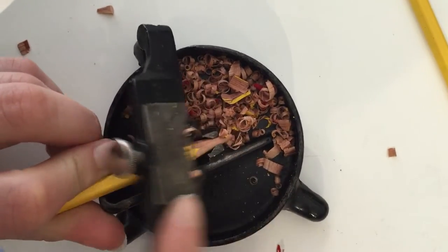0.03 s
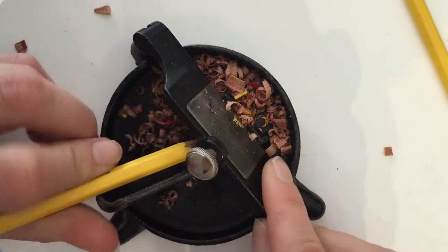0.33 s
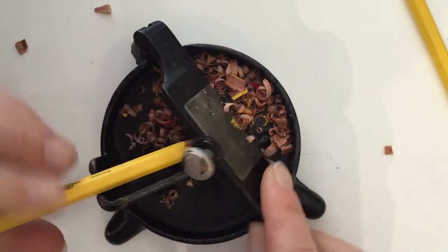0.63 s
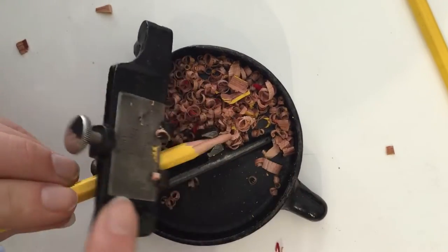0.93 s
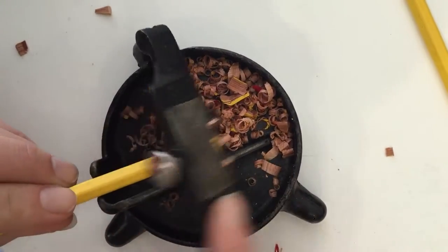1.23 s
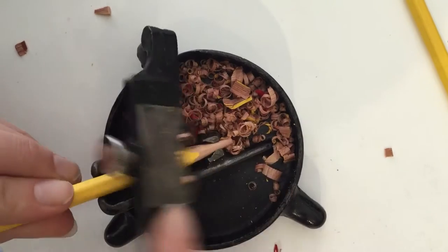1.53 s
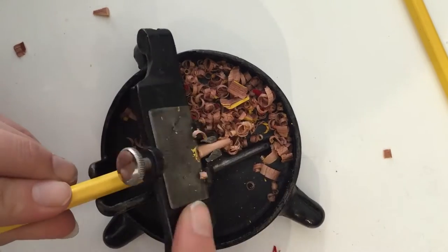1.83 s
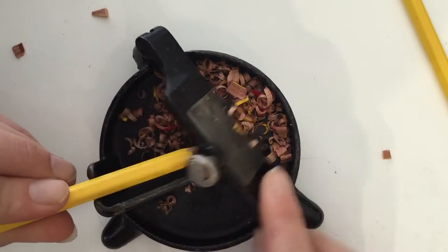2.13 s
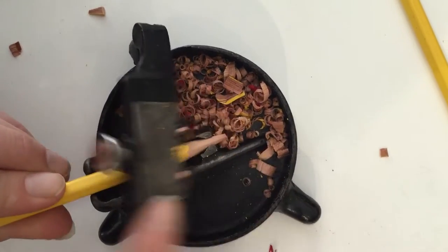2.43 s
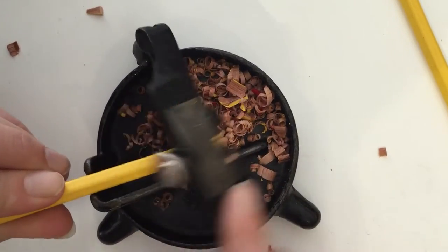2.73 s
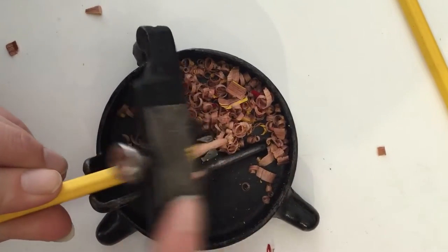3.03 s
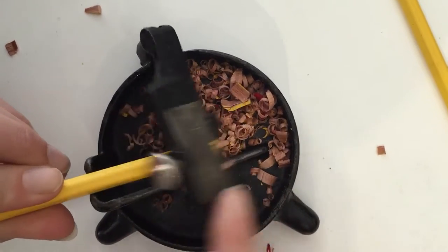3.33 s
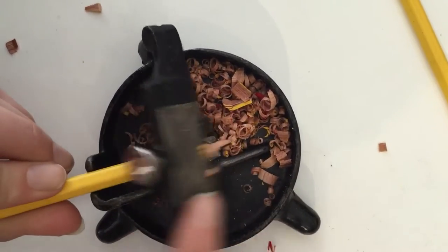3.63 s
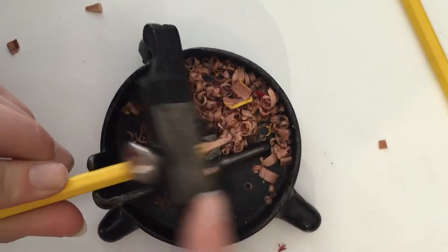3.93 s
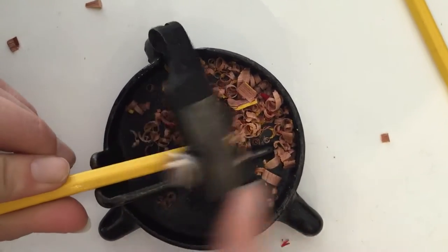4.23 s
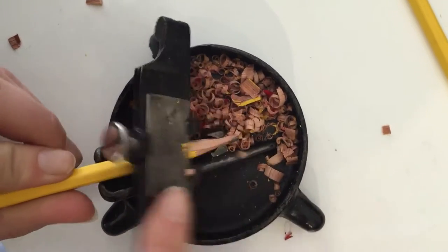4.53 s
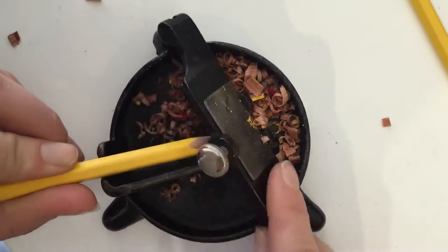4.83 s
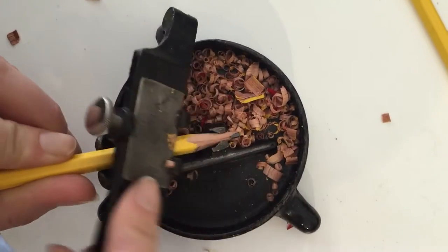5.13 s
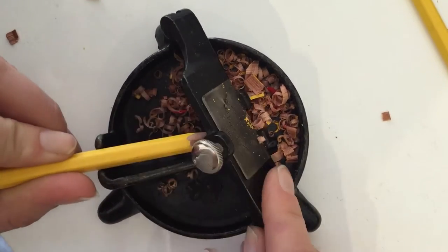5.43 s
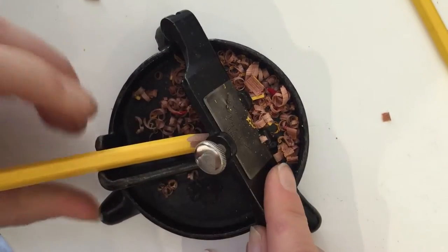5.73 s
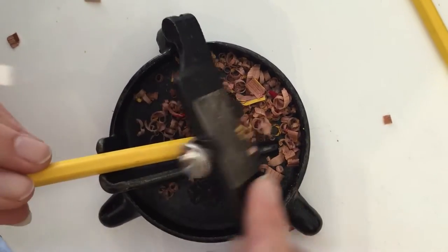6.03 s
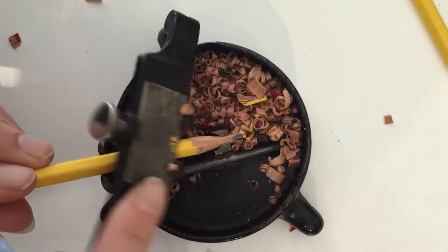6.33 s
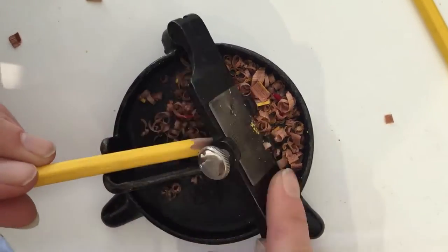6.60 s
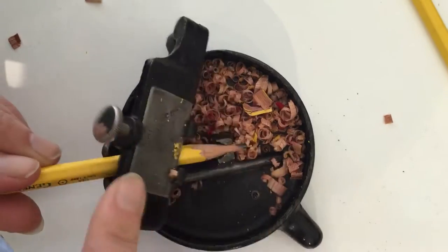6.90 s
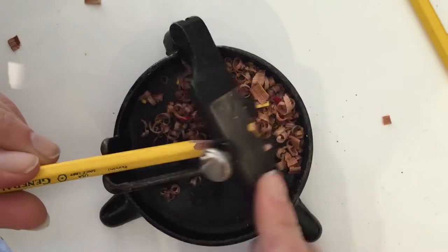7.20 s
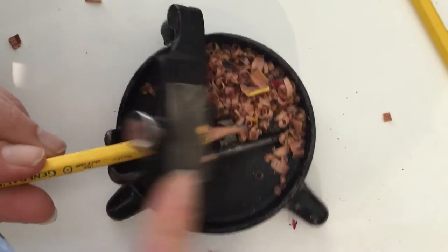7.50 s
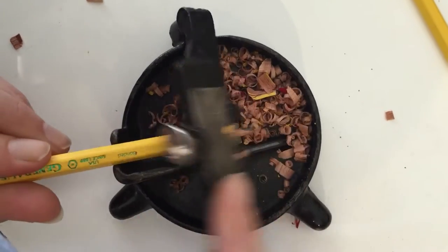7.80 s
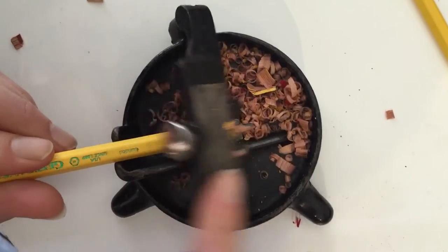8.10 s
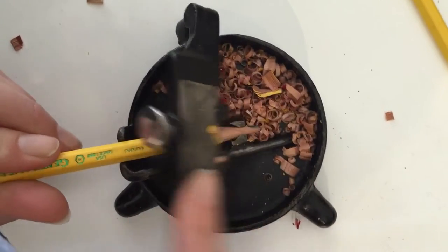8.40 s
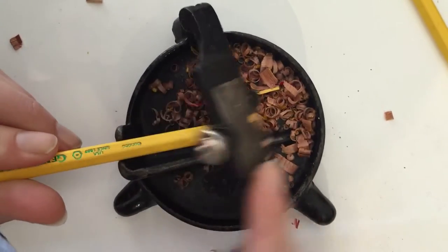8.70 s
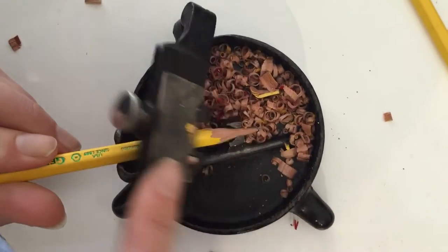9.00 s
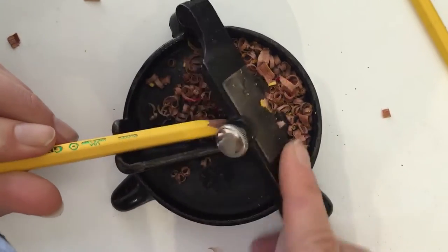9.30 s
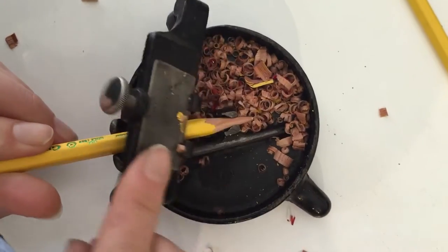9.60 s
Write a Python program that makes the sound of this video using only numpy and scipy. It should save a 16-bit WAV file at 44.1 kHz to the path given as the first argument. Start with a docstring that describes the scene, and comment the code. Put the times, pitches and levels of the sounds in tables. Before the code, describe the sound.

Close, raspy strokes of a blade shaving pencil wood, about two a second, alternate with clicks and knocks in a faintly humming room.

```python
"""At a table in a small, faintly humming room, a finger swings a hinged blade to and fro to sharpen a pencil.
Each cut tears wood fibres, whose fractures hiss and drive the resonances of the blade and of the
plastic tray beneath it. On the way back the blade only brushes the wood. The hollow arm clicks
and knocks at its turns, shavings drop, and the walls add a short reverberation."""
import sys
import numpy as np
from scipy import signal
from scipy.fft import rfft, irfft, next_fast_len
from scipy.io import wavfile
from scipy.ndimage import uniform_filter1d, map_coordinates

SR = 44100
rng = np.random.default_rng(int(sys.argv[2]) if len(sys.argv) > 2 else 0)


def log_audio(samples):
    """Write samples as a 16-bit WAV file to the path given in sys.argv[1]."""
    # one column per channel
    frames = np.atleast_2d(samples).T
    # limit to full scale, then quantise
    limited = np.clip(frames, -1, 1)
    pcm = np.round(limited * 32767).astype(np.int16)
    wavfile.write(sys.argv[1], SR, pcm)


N = 429975

# Cutting strokes. Each row: start and end in seconds, then force, mid-stroke hiss and hiss rise in dB.
CUT_STROKES = [(0.143, .32, -43.5, -51, -1), (1.227, 1.379, -41.5, -48, 6), (1.862, 1.88, -43, -51, 2),
               (1.935, 2.029, -37.5, -45.5, 12), (2.524, 2.648, -37.5, -44.5, 6),
               (3.086, 3.196, -40, -45, 4), (3.639, 3.779, -38, -41.5, 10), (4.2, 4.336, -40.5, -44, 17),
               (4.739, 4.878, -41.5, -45.5, 10), (5.35, 5.472, -38, -42.5, 1),
               (6.465, 6.611, -41, -42, 18.5), (7.051, 7.171, -38, -40.5, 16),
               (7.574, 7.679, -44.5, -40, 21), (8.134, 8.245, -42.5, -44.5, 11.5),
               (8.678, 8.798, -42.5, -46, 0), (9.235, 9.334, -45, -43.5, 2)]
# Return strokes. Each row: start and end in seconds, force in dB.
RETURN_STROKES = [(0.797, 1.035, -69.5), (1.514, 1.652, -63), (1.78, 1.848, -64.5), (2.078, 2.15, -67),
                  (2.261, 2.422, -61.5), (2.803, 2.921, -57), (3.376, 3.527, -59.5), (3.945, 4.075, -60),
                  (4.513, 4.611, -55), (5.023, 5.185, -60), (6.129, 6.27, -60), (6.788, 6.893, -53),
                  (7.31, 7.454, -55), (7.837, 7.959, -57.5), (8.395, 8.508, -57), (8.96, 9.08, -59),
                  (9.51, 9.63, -58.5)]
# Modes of the tray and the blade. Each row: frequency in Hz, bandwidth in Hz, gain in dB.
TRAY_MODES = [(184.5, 34.4, 4), (221, 87, -1), (281, 50, -2), (380, 24, -3), (534, 160, -15.5),
              (615, 127, -17.5), (810, 46, -5), (974, 44, -9.5), (1220, 120, -14.5)]
CUTTING_BLADE_MODES = [(2035, 170, -6.5), (2290, 125, 5.5), (2386, 57, -1), (2750, 1000, -37),
                       (3575, 71, -6), (3740, 85, -7.5), (4250, 93, -19.5), (5455, 480, -19.5)]
FREE_BLADE_MODES = [(1830, 184, 0), (2227, 177, 8.5), (2808, 170, 5), (3273, 74, -1), (3530, 68, 1),
                    (3740, 200, -1), (4220, 88, 3.5), (4790, 230, -9), (5500, 200, -5), (6380, 330, -10.5),
                    (7064, 234, -5), (8280, 140, -15)]
# Hiss of the edge on wood. Each row: frequency in Hz, gain in dB.
HISS_SPECTRUM = [(2650, -14), (4500, -5), (4850, -16), (5510, -8.5), (6220, -20), (6740, -17), (7490, -19),
                 (8330, -8.5), (10200, -10), (11600, 2), (12900, -7), (14600, 1.5), (15500, -3),
                 (16000, -10.5)]


def amp(db):
    """Decibels to amplitude ratio."""
    return 10 ** (np.asarray(db) / 20)

def unit(x):
    """Normalisation to rms 1."""
    return x / np.sqrt(np.mean(x ** 2) + 1e-20)

def along(points, hz):
    """Interpolation of (Hz, value) points on a logarithmic frequency axis."""
    f, v = np.transpose(points)
    return np.interp(np.log(hz + 1), np.log(f + 1), v)

def wobble(rate):
    """Smooth random modulation with rate knots a second."""
    knots = rng.standard_normal(int(N * rate / SR) + 4)
    return map_coordinates(knots, [np.arange(N) * rate / SR])

def gate(t, start, end, rise, fall):
    """A trapezoidal envelope with ramps centred on start and end."""
    return np.clip((t - start) / rise + .5, 0, 1) * np.clip((end - t) / fall + .5, 0, 1)

def add(track, start, sound):
    """Superposition of a sound on the track, from start in seconds."""
    part = track[max(round(start * SR), 0):][:len(sound)]
    part += sound[:len(part)]

def filtered(x, response):
    """Linear filtering: the spectrum of x times a frequency response."""
    size = next_fast_len(len(x) + SR // 4)
    return irfft(rfft(x, size) * response(np.fft.rfftfreq(size, 1 / SR)), size)[:len(x)]

def coloured(x, spectrum):
    """Spectral shaping by (Hz, dB) points."""
    return filtered(x, lambda hz: amp(along(spectrum, hz)))

def rung(x, modes):
    """Modal response: modes radiate little below their pitch, and neighbours move in opposite senses."""
    def peak(f, centre, width):
        return 1j * f * width / (centre ** 2 - f * f + 1j * f * width)
    return filtered(x, lambda f: sum((-1) ** k * amp(db) * peak(f, hz, width) * peak(f, hz, hz)
                                     for k, (hz, width, db) in enumerate(modes)))

def struck(blow, modes, scatter_db):
    """Impact response of peak 1; no two blows share their energy among the modes alike."""
    ring = rung(blow, [(hz, width, db + scatter_db * rng.standard_normal()) for hz, width, db in modes])
    return ring / np.abs(ring).max()

def fibres(rate, spread_db):
    """Shot noise: tiny fractures of uneven size, on average rate a second."""
    impulses = (rng.random(N) < rate / SR) * rng.standard_normal(N)
    return unit(impulses * amp(spread_db * rng.standard_normal(N)))

def patchy(x, depth_db):
    """Spectral modulation: sliding contact favours now one pitch, now another."""
    spectra = signal.stft(x, nperseg=512)[2]
    field = uniform_filter1d(rng.standard_normal(spectra.shape), size=5, axis=0)
    field = uniform_filter1d(field, size=7, axis=1)
    return unit(signal.istft(spectra * amp(depth_db * unit(field)), nperseg=512)[1][:N])

def background(hum_hz=58, hum_db=-47, rumble_db=-48, air_db=-52, swell_width_hz=12):
    """Ambient noise: a frequency-modulated hum, a narrow-band rumble that swells, and faint air."""
    # Swells of the rumble. Each row: start and end in seconds, pitch in Hz, level in dB.
    swell_events = [(5.935, 6.302, 49, -44.5), (6.447, 7.059, 57, -42.5), (6.902, 8.05, 73.2, -42.5)]
    # Spectra of the room's air and rumble. Each row: frequency in Hz, gain in dB.
    air_spectrum = [(20, -17), (100, -0.5), (180, -2), (280, -39.5), (500, -33.5), (1300, -35.5),
                    (2600, -42.5), (5000, -47), (9000, -52.5), (16000, -57)]
    rumble_spectrum = [(25, -46.5), (40, -23), (50, -8), (57, 5.5), (64, -2.5), (75, -5.5),
                       (90, -11.5), (130, -46), (300, -66)]
    def band(hz):
        noise = rng.standard_normal(N)
        return unit(filtered(noise, lambda f: np.exp(-(2 * (f - hz) / swell_width_hz) ** 2)))
    t = np.arange(N) / SR
    hum = np.sqrt(2) * np.sin(2 * np.pi * np.cumsum(hum_hz + 2.58 * wobble(3.7)) / SR)
    rumble = unit(coloured(rng.standard_normal(N), rumble_spectrum))
    swells = sum(amp(db) * gate(t, start, end, rise=.052, fall=.052) * band(hz)
                 for start, end, hz, db in swell_events)
    air = unit(coloured(rng.standard_normal(N), air_spectrum))
    return amp(hum_db) * hum + amp(rumble_db) * rumble + swells + amp(air_db) * air

def reverberation(x, delay_s=.007):
    """Reflections decay at each frequency's own rate; fresh random tails keep any pitch from ringing."""
    # Decay of the room. Each row: frequency in Hz, time to fall 60 dB in seconds.
    decay_times = [(150, 0.46), (400, 0.23), (2500, 0.18), (11000, 0.25), (16000, 0.11)]
    out, block = np.zeros(N), SR // 3
    for first in range(0, N, block):
        hz, t, spectra = signal.stft(rng.standard_normal(SR // 2), SR, nperseg=256)
        decay = amp(-60 * t / along(decay_times, hz)[:, None])
        tail = signal.istft(spectra * decay, SR, nperseg=256)[1]
        echo = signal.fftconvolve(x[first:first + block], tail / np.linalg.norm(tail))
        add(out, first / SR + delay_s, echo)
    return coloured(out, [(200, -11), (1000, -10.5), (3000, -20), (12000, -21)])

def tick(start=1.4233, peak_db=-32, t60=.0073):
    """One exponentially decaying pulse, heard as a dry tick."""
    out, t = np.zeros(N), np.arange(SR // 20) / SR
    add(out, start, -amp(peak_db - 60 * t / t60))
    return out

def handling(rest_db=-60, cut_db=-49, return_db=-46, follow=.46):
    """Structure-borne noise: fingers and pivot make the tray murmur, more so on firm strokes."""
    # The tray's murmur. Each row: frequency in Hz, gain in dB.
    murmur_spectrum = [(80, -50), (130, -17.5), (180, 10.5), (235, -6.5), (300, -1.5), (375, -5.5),
                       (470, -20), (820, -30), (1400, -35.5), (2300, -29.5), (4500, -40), (9000, -43)]
    t = np.arange(N) / SR
    level = np.full(N, amp(rest_db))
    for strokes, swing_db in ((CUT_STROKES, cut_db), (RETURN_STROKES, return_db)):
        mean_force = np.mean([row[2] for row in strokes])
        for start, end, force, *_ in strokes:
            swing = gate(t, start - .041, end + .075, rise=.2, fall=.2)
            level = np.maximum(level, amp(swing_db + follow * (force - mean_force)) * swing)
    level *= amp(3 * wobble(22))
    return level * patchy(coloured(rng.standard_normal(N), murmur_spectrum), depth_db=4.5)

def crumbs(rate=4, level_db=-53, spread_db=3, contact_t60=.012):
    """Random light impacts: shavings shift and drop during and just after the strokes."""
    out, t = np.zeros(N), np.arange(SR // 16) / SR
    for start, end, *_ in CUT_STROKES + RETURN_STROKES:
        for when, chance in rng.random((3, 2)):
            if chance < rate * (end - start):
                grain = rng.standard_normal(len(t)) * amp(-60 * t / contact_t60)
                gain = amp(level_db + spread_db * rng.standard_normal())
                ring = struck(grain, FREE_BLADE_MODES, scatter_db=5)
                add(out, start + 2 * when * (end - start), gain * ring)
    return out

def pencil(contact_t60=.033):
    """Let go for a new grip, the pencil rocks in its groove; each impact excites its wooden modes."""
    # Rocking impacts. Each row: time in seconds, peak in dB.
    impacts = [(0.502, -39), (.52, -40), (0.533, -46)]
    # The loose pencil. Each row: frequency in Hz, bandwidth in Hz, gain in dB.
    pencil_modes = [(811, 30, 10), (1910, 110, -1), (2450, 300, -5.5), (2800, 480, -7)]
    out, t = np.zeros(N), np.arange(SR // 8) / SR
    for start, db in impacts:
        blow = rng.standard_normal(len(t)) * amp(-60 * t / contact_t60)
        add(out, start, amp(db) * struck(blow, pencil_modes, scatter_db=0))
    return out

def knocks(grit_db=-20, grit_t60=.053):
    """Contact time limits bandwidth: the longer the arm pushes on the tray, the duller the thud."""
    # Blows on the tray. Each row: time in seconds, peak in dB, contact time in seconds.
    blows = [(.843, -36, 0.0067), (1.243, -26.5, 0.0021), (2.288, -33.5, 0.0022), (3.982, -23.5, 0.0034),
             (4.531, -24.5, 0.0026), (4.89, -32.5, 0.0014), (5.057, -23, 0.0074), (5.486, -33, 0.0019),
             (6.148, -23.5, 0.0041), (6.804, -23.5, 0.0022), (6.876, -23, 0.0021), (7.166, -14.5, 0.0042),
             (7.349, -24.5, 0.002), (7.511, -31.5, 0.0029), (7.669, -14, 0.003), (7.863, -27.5, 0.0031),
             (8.145, -11.5, 0.00097), (8.426, -19, 0.0036), (9.161, -25.5, 0.0024), (9.532, -30.5, 0.0067)]
    out, t = np.zeros(N), np.arange(SR // 4) / SR
    for when, db, contact_s in blows:
        push = np.sin(np.pi * np.clip(t / contact_s, 0, 1)) ** 2
        grit = amp(grit_db - 60 * t / grit_t60) * rng.standard_normal(len(t))  # crumbs crunch under it
        add(out, when - contact_s / 2, amp(db) * struck(push + grit, TRAY_MODES, scatter_db=2.5))
    return out

def clicks(crack_db=12, arm_db=-5, chatter_db=-20, chatter_t60=.021, crack_t60=.017):
    """Impulse excitation: the blade snaps against wood or its stop, cracks, and rings with the arm."""
    # Snaps. Each row: time in seconds, level in dB, relative treble in dB.
    snaps = [(1.613, -21, -15.5), (1.8324, -28, -17), (2.377, -16, -13.5), (2.4838, -39.5, -24),
             (2.9015, -17.5, -19.5), (3.2375, -42.5, -27), (3.5131, -21, -25.5), (3.7723, -25.5, -22),
             (3.9855, -24, -26), (4.1096, -30, -29), (4.3306, -26.5, -14), (4.5275, -29, -18),
             (4.6426, -35.5, -24), (4.871, -36, -32), (4.9521, -45, -22), (5.07, -30, -18),
             (5.1738, -21.5, -18), (6.1648, -30.5, -25), (6.2587, -18, -11), (6.6053, -21, -16.5),
             (6.8918, -17.5, -14), (7.0524, -31.5, -6), (7.1637, -9.5, -16), (7.4282, -27, -20),
             (7.6672, -11, -19.5), (7.856, -35.5, -7.5), (7.9509, -18, -16.5), (8.1444, -26.5, -35),
             (8.2345, -28.5, -9), (8.4322, -24, -16.5), (8.5145, -18, -13.5), (9.354, -39, -13),
             (9.5402, -26, -19), (9.6078, -27, -21)]
    # The bright crack. Each row: frequency in Hz, gain in dB.
    crack_spectrum = [(3000, -62), (7500, -20), (9600, -10.5), (10500, -5.5), (11400, -14), (12500, -11.5),
                      (13600, 1), (14600, -14), (16500, 2)]
    # The hollow arm. Each row: frequency in Hz, bandwidth in Hz, gain in dB.
    arm_modes = [(198.5, 48, -0.5), (244, 300, -7.5), (379, 24, 6.5), (525, 76, -14.5), (559, 170, -33),
                 (813, 63, -17.5), (1258, 36, -25.5)]
    out, t = np.zeros(N), np.arange(SR // 8) / SR
    impulse = t == 0
    for when, db, treble_db in snaps:
        chatter = amp(chatter_db - 60 * t / chatter_t60) * rng.standard_normal(len(t))
        crack = unit(coloured(rng.standard_normal(len(t)), crack_spectrum)) * amp(-60 * t / crack_t60)
        ring = struck(impulse + chatter, FREE_BLADE_MODES, scatter_db=2)
        hollow = amp(arm_db) * struck(impulse, arm_modes, scatter_db=4.5)
        add(out, when + .0007, amp(db) * (ring + hollow + amp(treble_db + crack_db) * crack))
    return out

def brushing(grit_db=-1, sing_db=-4, tray_db=1, hiss_db=-.5, catch_db=6.5):
    """Sliding friction: swinging back, the blade catches on the grain and stirs the tray."""
    t = np.arange(N) / SR
    contact = sum(amp(force) * gate(t, start, end, rise=.05, fall=.03) ** 2
                  for start, end, force in RETURN_STROKES)
    blade = rung(fibres(rate=5000, spread_db=3), FREE_BLADE_MODES)
    grit = unit(coloured(blade, [(4000, -.5), (7000, -3)]))
    sing = unit(rung(fibres(rate=3300, spread_db=7.5), CUTTING_BLADE_MODES))
    hiss = unit(coloured(fibres(rate=8200, spread_db=6), HISS_SPECTRUM))
    tray = unit(rung(fibres(rate=1700, spread_db=7), TRAY_MODES))
    rub = sum(amp(db) * patchy(layer, catch_db)
              for db, layer in ((grit_db, grit), (sing_db, sing), (tray_db, tray)))
    rub *= amp(4.5 * wobble(25))
    return contact * (rub + amp(hiss_db) * patchy(hiss, depth_db=4))

def grazing(level_db=-19, lead_s=.027, trail_s=.029):
    """Light friction rings the blade from just before each cut until just after it."""
    t = np.arange(N) / SR
    touch = sum(amp(force + level_db) * gate(t, start - lead_s, end + trail_s, rise=.091, fall=.036)
                for start, end, force, *_ in CUT_STROKES)
    unsteady = amp(3 * wobble(35))
    return touch * unsteady * unit(rung(fibres(rate=4600, spread_db=6.5), CUTTING_BLADE_MODES))

def chips(level_db=-6, tear_s=.019, follow=.42):
    """Fracture ends each cut: the shaving tears off and the freed blade rings, louder after rising hiss."""
    t = np.arange(N) / SR
    tear = sum(amp(hiss + follow * rise + level_db) * gate(t, end - tear_s, end, rise=.0069, fall=.004)
               for _, end, _, hiss, rise in CUT_STROKES)
    ring = rung(fibres(rate=9000, spread_db=1.5), FREE_BLADE_MODES)
    return tear * unit(coloured(ring, [(2200, -2.5), (3600, 3.5), (6000, .5)]))

def seated(modes, detune=.0073, scatter_db=1):
    """Boundary conditions: each stroke seats the pencil a little differently and shifts the modes."""
    return [(hz * (1 + detune * rng.standard_normal()), width, db + scatter_db * rng.standard_normal())
            for hz, width, db in modes]

def cuts(arch_db=6.5, grain_db=1.5, tray_db=1, edge_rise_db=8, hiss_curve=1.1, sag=.054,
         bite=1.15, bite_s=.008, reflection=.17, near_s=.00068, slide_s=.00044):
    """Forced vibration: tearing fibres hiss and drive blade and tray; the cut deepens in mid-stroke."""
    # The tray pressed by the cut. Each row: frequency in Hz, bandwidth in Hz, gain in dB.
    loaded_tray_modes = [(187.3, 41, 4), (309, 69, 0), (369.5, 66, -3), (510, 79, -14), (614, 52, -15),
                         (804, 26.7, -6), (915, 222, -19), (1175, 87, -24.5)]
    out = np.zeros(N)
    fractures = fibres(rate=11000, spread_db=.5) * amp(grain_db * (wobble(170) + .5 * wobble(40)))
    hiss = patchy(coloured(fractures, HISS_SPECTRUM), depth_db=6)
    for start, end, force, hiss_db, hiss_rise_db in CUT_STROKES:
        here = np.arange(int((start - .01) * SR), int((end + .05) * SR))
        travel = np.clip((here / SR - start) / (end - start), 0, 1)
        contact = gate(here / SR, start, end, rise=.003, fall=.012)
        depth = contact * amp(arch_db * (np.sin(np.pi * travel) - 2 / np.pi))
        depth *= 1 + bite * np.exp(-travel * (end - start) / bite_s)  # the edge digs in with a jolt
        # A sliding comb filter: fractures reflect from the pencil's end, later as the edge advances.
        delay_s = near_s + slide_s * travel
        reflected = map_coordinates(fractures[here], [np.arange(len(here)) - SR * delay_s])
        drive = depth * (fractures[here] + reflection * reflected)
        tray = coloured(rung(drive, seated(loaded_tray_modes)), [(1200, -26.5), (1450, -16)])
        steel = coloured(rung(drive, seated(CUTTING_BLADE_MODES)), [(1650, -11), (1980, -3.5)])
        upper_modes = filtered(steel, lambda hz: hz > 3000)
        steel += upper_modes * (amp(edge_rise_db * (travel - .5)) - 1)  # brighter towards the tip
        steel = map_coordinates(steel, [np.cumsum(1 + sag * (.5 - travel))])  # the pitch sinks a little
        out[here] += np.sqrt(contact.mean()) * amp(force) * (amp(tray_db) * unit(tray) + unit(steel))
        # On most strokes the hiss grows as the edge nears the lead.
        climb_db = hiss_rise_db * (travel ** hiss_curve - .5 ** hiss_curve)
        out[here] += contact * amp(hiss_db + climb_db) * unit(hiss[here])
    return out

def scene():
    """Superposition of the sharpener's direct sound, its reverberation and the background."""
    tool = cuts() + chips() + grazing() + brushing() + clicks() + knocks() + pencil() + crumbs()
    return (tool + reverberation(tool) + handling() + background() + tick())[None]

def record(dry, top_hz=15750, fade_hz=60):
    """The microphone's band limit acts as a steep low-pass filter."""
    return np.array([filtered(channel, lambda hz: .5 - .5 * np.tanh((hz - top_hz) / (2 * fade_hz)))
                     for channel in dry])


dry = scene()
out = record(dry)
log_audio(out)
```